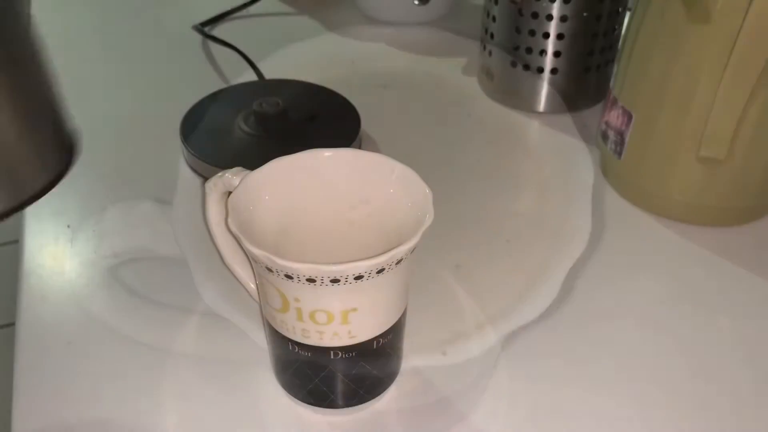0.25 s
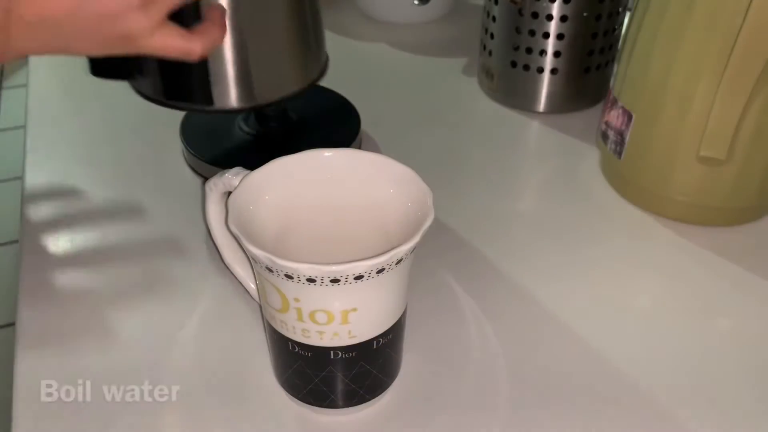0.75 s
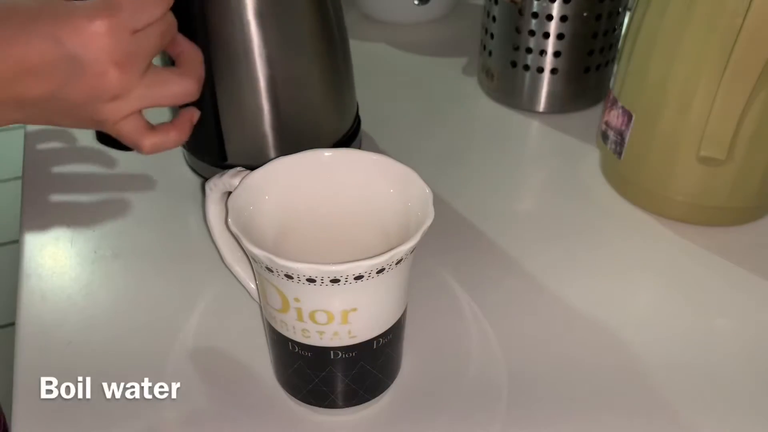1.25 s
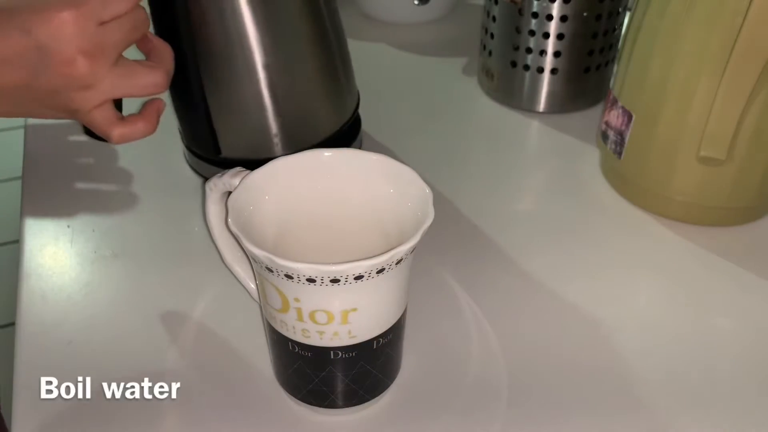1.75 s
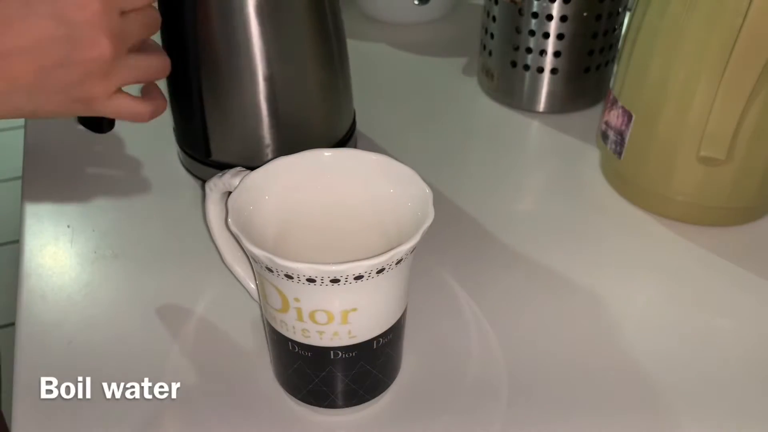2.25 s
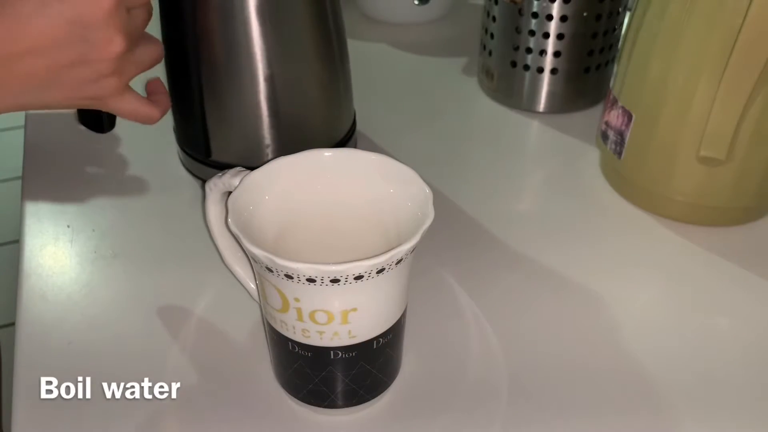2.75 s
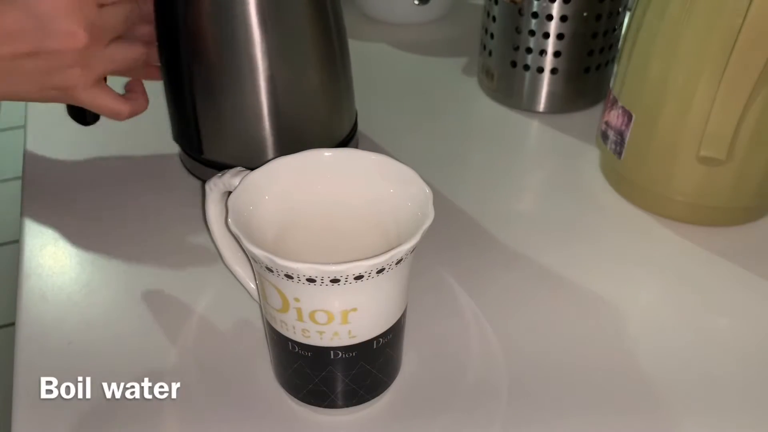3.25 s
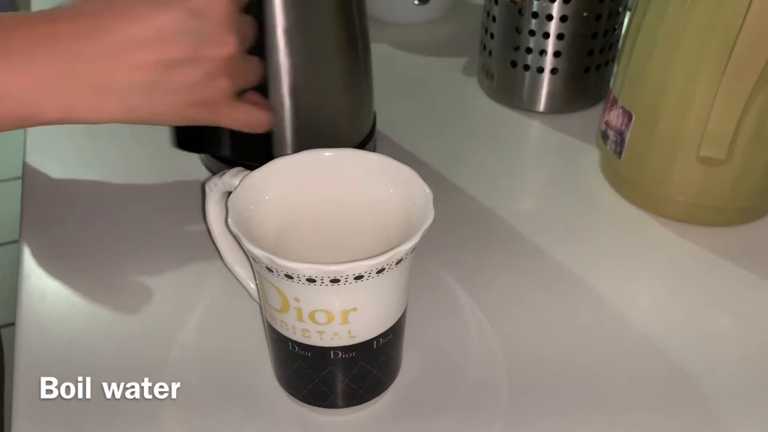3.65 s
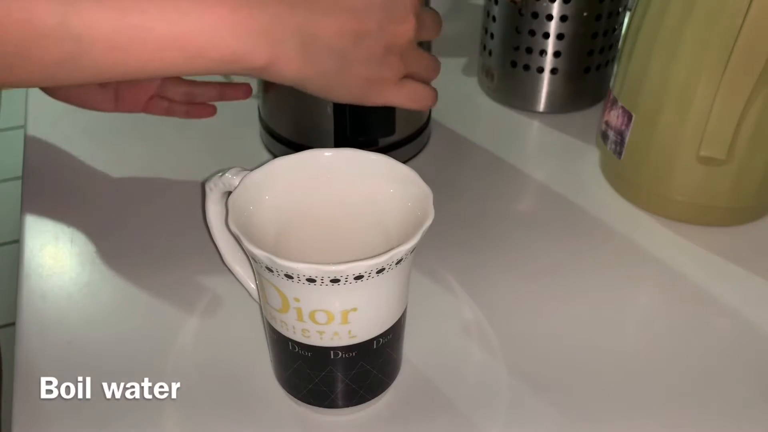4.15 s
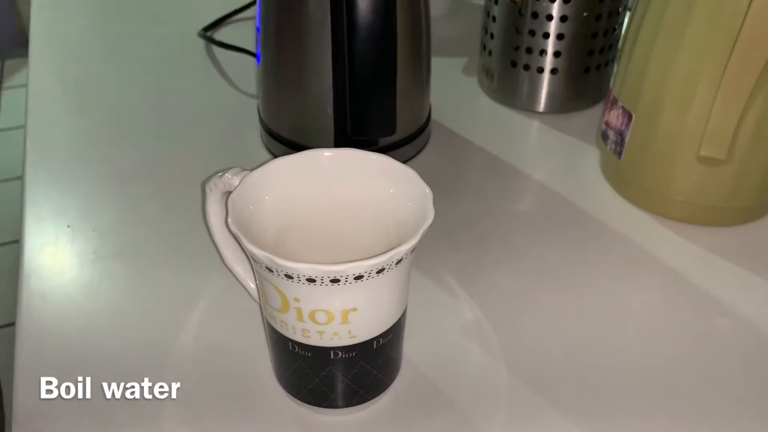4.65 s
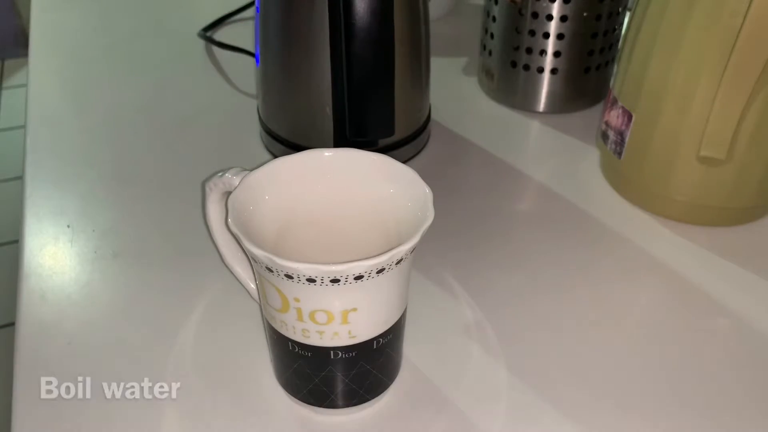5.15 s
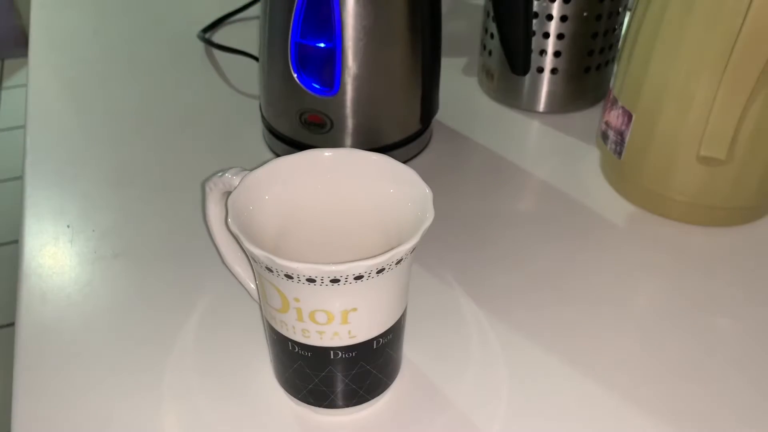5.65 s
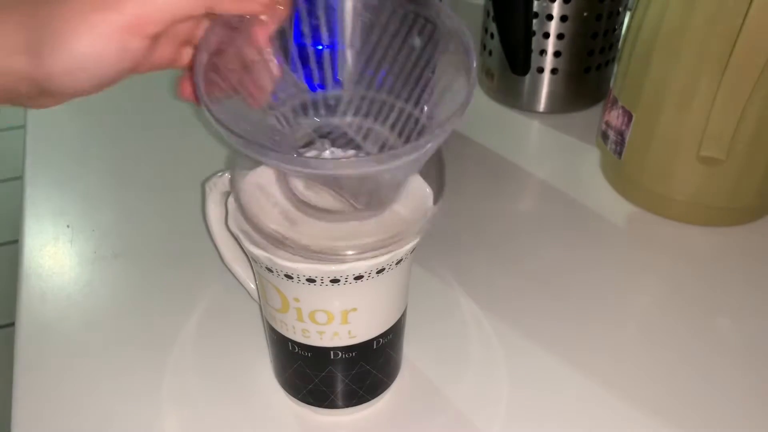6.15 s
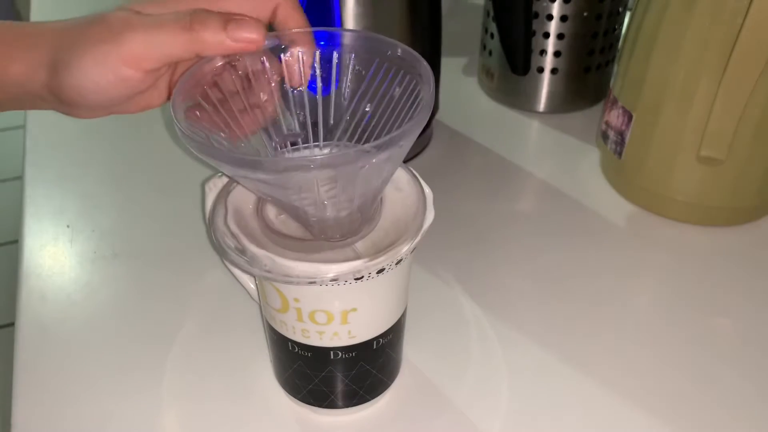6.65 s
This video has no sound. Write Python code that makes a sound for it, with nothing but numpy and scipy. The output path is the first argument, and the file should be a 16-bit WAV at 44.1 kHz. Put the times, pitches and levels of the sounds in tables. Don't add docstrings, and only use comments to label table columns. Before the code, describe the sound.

In a small hard kitchen with a faint fridge hum, a lid snaps shut, then a steel kettle knocks onto its plastic base and is turned with dull bumps, rubbing, brief squeaks and small clicks. The sound cuts abruptly to a steady hissing, singing boil. A hard plastic dripper clacks onto a mug, bounces and rattles into place. Close stereo phone microphone, short lively room tail.

```python
import sys
import numpy as np
from scipy import signal
from scipy.fft import rfft, irfft, next_fast_len
from scipy.io import wavfile
from scipy.ndimage import uniform_filter1d

SR = 44100
rng = np.random.default_rng(int(sys.argv[2]) if len(sys.argv) > 2 else 0)


def file_out(sig):
    cols = np.atleast_2d(sig).T
    lim = np.clip(cols, -1, 1)
    pcm = np.round(lim * 32767).astype(np.int16)
    wavfile.write(sys.argv[1], SR, pcm)


def to_linear_factor(level_db):
    exponent = np.asarray(level_db, float) / 20
    return 10 ** exponent


N = 303893
T = np.arange(N) / SR
CHANGE_S, FADE_OUT_S, FADE_IN_S = 5.386, 0.03, 0.022

# f/Hz, level/dB per Hz
AIR = [(30, -3), (145, -8.5), (239, -10.5), (500, -20), (780, -22.5), (1000, -27), (4530, -46.5),
       (16000, -51)]
AIR_DB = -53
# f/Hz, level/dB
HUM = [(123.4, -60.5), (226.3, -72.5), (59.7, -71)]
# loudest t/s, swell t/s, fade t/s, level/dB, treble over it/dB
SLIDES = [(.06, 0.1, 0.22, -62, -0.5), (.35, 0.14, 0.21, -60, -6), (.64, .007, 0.28, -57.5, -1),
          (.75, 0.15, 0.084, -59, 1), (1.39, 0.067, 0.19, -65.5, -11), (1.816, 0.023, .05, -61, -10),
          (2.19, 0.067, 0.17, -76, -20), (2.44, 0.064, 0.04, -68, -9), (3.016, .03, 0.077, -64.5, -27),
          (3.17, 0.066, 0.097, -65.5, -13), (3.33, 0.12, 0.27, -59, -9.5), (3.5, 0.025, 0.22, -66.5, -4),
          (3.68, 0.64, 0.35, -66.5, -1), (3.88, 0.17, 0.26, -63.5, -0.5), (4.01, 0.34, 0.11, -63, -13),
          (4.157, 0.0053, 0.13, -52.5, -16), (4.25, 0.065, 0.11, -68, -7), (4.44, 0.36, 0.28, -69.5, 0),
          (4.78, 0.13, 1, -66.5, -1), (4.983, 0.052, 0.13, -49, -10.5), (5.06, .05, 0.13, -66, -11),
          (5.222, 0.15, 0.031, -70.5, -37.5), (5.328, 0.0075, 0.084, -55.5, -21)]
# loudest t/s, swell t/s, fade t/s, level/dB
RUBS = [(.05, 0.044, 0.11, -65), (.34, 0.11, 0.18, -77), (.64, 0.0068, 0.25, -51), (1.41, 0.15, 0.21, -57),
        (1.69, 0.26, 0.13, -64.5), (1.822, .022, 0.07, -38.5), (2.16, 0.14, .25, -61),
        (2.45, 0.11, 0.11, -65), (3.02, .05, .15, -70.5), (3.28, 0.23, 0.08, -66), (3.5, 0.96, 0.53, -65),
        (3.767, 0.011, 0.036, -52), (3.9, 0.54, 0.45, -60.5), (4.2, 0.046, 0.21, -63),
        (4.606, 0.022, 0.089, -58.5), (4.72, .05, 0.16, -61), (4.984, 0.039, 0.18, -54.5),
        (5.116, 0.0092, .1, -60), (5.25, 0.038, 0.1, -63), (5.345, 0.048, 0.058, -51.5)]
# f/Hz, width/Hz, level/dB
HAND_ON_KETTLE = [(842, 58, 5), (1235, 35, 8), (1790, 36, 6), (2035, 59, 10), (2514, 30, -15),
                  (3280, 64, 6)]
STROKE_DB, STROKE_BEND = 22.5, 1.3

# t/s, shell peak level/dB, hollow boom peak level/dB, hardness/dB per octave
LID = [
    (0.0745, -27.5, -24, 5.5),
    (0.0795, -23.5, -12, 3.5),
    (0.359, -54, -55, 1.5),
]
# f/Hz, level/dB, t60/s
LID_MODES = [(208, -15, 0.038), (270.7, -8.5, 0.034), (321.4, -6.5, 0.043), (373, -17, 0.044),
             (559, -20.5, 0.032), (800, -26.5, 0.092), (1283, -25.5, 0.093), (2750, -28, 0.044),
             (4236, -32, 0.045), (5140, -29.5, 0.045), (8330, -30, 0.023)]
# t/s, peak level/dB, pitch/octaves above the lowest boom
THUDS = [(0.081, -28, 2.24), (0.586, -61.5, 0.18), (1.032, -39, 0.69), (1.152, -46.5, 1.1),
         (1.202, -55, .05), (1.444, -52.5, 1.1), (1.828, -30.5, 0.26), (1.851, -39.5, 1.06),
         (1.896, -32.5, 0.9), (2.106, -40.5, 0.63), (2.327, -59, 0.69), (2.601, -45.5, 0.52),
         (3.144, -45, 0.4), (3.346, -46, 0.92), (3.44, -51, 0.91), (3.502, -50, 0.37), (3.807, -47.5, 0.2),
         (3.903, -38.5, 0.6), (4.097, -44.5, 0.25), (4.233, -42.5, 0.62), (4.615, -47, 0.45),
         (4.704, -35, 0.24), (5.028, -43.5, 0.32), (5.124, -35, 0.21), (5.268, -49, 1.05),
         (6.248, -42.5, 0.85), (6.356, -35, 1.52), (6.447, -40.5, 1.17)]
# f/Hz, t60/s
BOOM = [(55, 0.46), (79, 0.21), (116, 0.33), (200, 0.092)]
PUSH_DB_PER_OCT = 13
# loudest t/s, swell t/s, fade t/s, level/dB, f/Hz
SQUEAKS = [(.365, 0.027, .15, -66.5, 1960), (.65, 0.014, 0.2, -53, 1570), (.74, 0.027, .04, -50.5, 520),
           (.76, .08, .1, -60, 4530), (1.4, .08, 0.07, -67, 3300), (1.43, .04, .08, -59, 523),
           (1.49, 0.11, 0.084, -61, 1620), (1.7, .3, .25, -77, 4800), (2.12, .15, 0.092, -73, 2030),
           (3.245, 0.0074, .05, -55.5, 750), (3.31, 0.0083, 0.043, -52, 590), (3.5, .012, 0.51, -70, 3200),
           (3.55, .5, .6, -59.5, 876), (3.8, 0.34, 0.17, -71, 1920), (3.95, .2, 0.29, -62, 1185),
           (4.17, .02, .15, -71, 3300), (4.98, .04, 0.1, -57, 2060), (5.05, 0.058, 0.07, -60, 380),
           (5.34, 0.018, 0.076, -51.5, 2400)]
SQUEAK_Q = 6
# t/s, shell peak level/dB, hollow boom peak level/dB, hardness/dB per octave
BASE = [(0.634, -33.5, -55.5, -13), (1.023, -29, -62, -8.5), (1.031, -13.5, -24, -8), (1.037, -28, -34, -4),
        (1.089, -35, -61, -6), (1.144, -22, -62, -10), (1.151, -42, -25.5, -4), (1.202, -21, -69, -10),
        (1.248, -36.5, -70, -11), (1.415, -39.5, -44.5, -12.5), (1.826, -18.5, -30, -8.5),
        (1.808, -38, -60, -13), (1.819, -31, -60, -9), (1.843, -61, -60, 10), (1.847, -35.5, -42, -10),
        (1.89, -19, -35, -5.5), (2.137, -45.5, -59, -24), (3.016, -49, -65.5, -8),
        (3.139, -35.5, -48, -11.5), (3.305, -54, -51.5, -19), (3.765, -45, -52, -9), (3.842, -33, -66, -12),
        (3.895, -44.5, -48.5, -10), (4.085, -58.5, -48, -14), (4.155, -50, -74.5, -5.5),
        (4.6, -64.5, -48, -7), (4.698, -42.5, -43, -6.5), (5.118, -42.5, -45.5, -10),
        (5.326, -43, -44.5, -13)]
# f/Hz, level/dB, t60/s
BASE_MODES = [(222, -3, 0.05), (351, 10, 0.058), (806, -8.5, 0.058), (921, -8, 0.071), (1206, -16, 0.043),
              (1432, -17, 0.034), (1888, -14.5, 0.043), (2083, -11.5, 0.056), (2600, -4, 0.04),
              (3340, -4, 0.043), (4000, -10, 0.032), (4870, -32, 0.016)]
# f/Hz, width/Hz, level/dB
STEEL = [(1192, 3.5, -3), (2050, 6.8, -7), (4800, 13, -18)]
# t/s, shell peak level/dB, hollow boom peak level/dB, hardness/dB per octave
HANDLE = [
    (2.403, -38.5, -59, -4),
    (2.624, -46, -56, 2.5),
    (2.632, -27.5, -52, 0.9),
]
# f/Hz, level/dB, t60/s
HANDLE_MODES = [(387, -10, 0.041), (824, -10, 0.12), (910, -11.5, 0.054), (1420, -6, .05),
                (1580, 0.5, 0.047), (1694, 1.5, 0.043), (2910, -8.5, 0.054), (3820, -5, 0.029),
                (4510, -7, 0.027), (7060, -2, 0.03), (8120, 3, 0.031)]
# t/s, shell peak level/dB, hollow boom peak level/dB, hardness/dB per octave
SWITCH = [
    (3.488, -48, -50.5, 1.5),
]
# f/Hz, level/dB, t60/s
SWITCH_MODES = [(380, -10, 0.039), (3200, 7, 0.04), (3300, 3, 0.036), (3000, -6, .03), (4630, -4, 0.02)]

# f/Hz, width/Hz, level/dB
KETTLE = [(356.5, 14.5, -6), (464.5, 13, -3), (580, 85, -23), (785, 41, -8.5), (915.5, 18.7, 0),
          (1263, 50, -10), (1387, 44.5, -13), (1510, 32, -23), (1777, 16.6, -7.5), (2570, 31, -19),
          (2707, 40, -17.5), (3110, 23, -19), (4540, 57, -19)]
# f/Hz, level/dB per Hz
STEAM = [(88, -54), (150, -15.5), (466, -17), (1760, -12), (10000, -27.5), (11700, -37.5), (13700, -32.5),
         (16000, -84)]
# t/s, level/dB
BOIL = [
    (5.391, -40.5),
    (5.6, -39.5),
    (5.9, -40),
    (6.15, -39),
    (6.5, -37.5),
    (6.89, -39),
]
DRIFT, FLICKER_DB = 0.007, 3
# t/s, shell peak level/dB, hollow boom peak level/dB, hardness/dB per octave
DRIPPER = [
    (6.2105, -33, -56, -2),
    (6.2148, -24.5, -36, 5.5),
    (6.22, -24, -46, 1.5),
    (6.2375, -23.5, -42, 1.5),
    (6.252, -29, -48, -1),
    (6.264, -37, -44, 3.5),
]
# f/Hz, level/dB, t60/s
DRIPPER_MODES = [(360, -10, 0.022), (930, -22, .04), (1195, -8.5, 0.037), (2110, -9.5, 0.043),
                 (2550, -18, 0.07), (3300, -11, 0.029), (4990, -14, 0.02), (6320, -11, 0.019),
                 (8230, -11, 0.028), (10300, -12.5, 0.019), (13560, -21, 0.013)]
# t/s, shell peak level/dB, hollow boom peak level/dB, hardness/dB per octave
SEATING = [(6.327, -25.5, -39, 0.5), (6.335, -31, -52, -1), (6.347, -29.5, -34, -0.5),
           (6.3515, -20.5, -35, 5), (6.357, -22.5, -37, -11), (6.366, -25, -37.5, 3), (6.376, -31, -40, -1),
           (6.399, -38.5, -34.5, 4.5), (6.43, -43, -38, -10), (6.441, -29.5, -48, 4), (6.45, -50, -48, -1),
           (6.528, -42.5, -35, 4.5), (6.538, -45, -57, -4)]
# f/Hz, level/dB, t60/s
SEATING_MODES = [(362, -10, 0.02), (741, -8.5, 0.049), (920, -11, 0.025), (1200, -10.5, 0.049),
                 (1854, -14, 0.032), (2190, -16, 0.042), (3300, -11.5, 0.022), (4890, -16, 0.015),
                 (6500, -15.5, 0.04), (7960, -10, 0.021), (9800, -13.5, .014), (13500, -20, 0.013)]

KNOCK_HZ = (1000, 3200, 8500)
# f/Hz, likeness/-1..1
LIKENESS = [(60, 0.68), (290, .78), (640, 0.095), (1400, .05), (3000, 0.18), (15000, -0.55)]
# f/Hz, t60/s
ROOM = [(100, 0.38), (400, 0.31), (1500, 0.32), (5000, 0.37), (12000, 0.26)]
# band number (each 689 Hz wide), share of moments kept in mid, in side
PATCHY = [(14, 1, .4), (15, 1, .45), (16, .22, 1), (17, .04, 1), (18, 1, .7), (19, 1, .03), (20, .8, .6),
          (21, 0, .6), (22, 0, .12), (23, 0, 0)]


def on_log(hz, table):
    f, v = np.transpose(table)
    return np.interp(np.log(np.maximum(hz, 1)), np.log(f), v)


def shape(x, gain):
    size = next_fast_len(x.shape[-1])
    hz = np.arange(size // 2 + 1) * SR / size
    return irfft(rfft(x, size) * gain(hz), size)[..., :x.shape[-1]]


def level(x, db):
    return x * to_linear_factor(db) / np.sqrt(np.mean(x ** 2))


def add(out, x, s):
    i = int(s * SR)
    out[..., i:i + x.shape[-1]] += x[..., :out.shape[-1] - i]


def walk(rate, size=N):
    hold = int(SR / rate)
    steps = np.repeat(rng.standard_normal(size // hold + 1), hold)
    return 1.3 * uniform_filter1d(uniform_filter1d(steps, hold), hold)[:size]


def grains(rate, scatter_db, size=N):
    out = np.zeros((2, size))
    where = rng.random((2, size)) < rate / SR
    count = where.sum()
    tick_size = to_linear_factor(-scatter_db * np.log(0.003 + rng.random(count)))
    out[where] = tick_size * rng.standard_normal(count)
    return out


def resonate(x, peaks):
    def gain(f):
        total = 0
        for k, (hz, width_hz, db) in enumerate(peaks):
            total = total + (-1) ** k * to_linear_factor(db) / (1 + 1j * (f * f - hz * hz) / (width_hz * f + 1e-9))
        return total
    return shape(x, gain)


def sing(x, hz, width_hz):
    wandering_hz = hz * (1 + DRIFT * walk(7.6, size=x.shape[-1]))
    turn = np.exp(2j * np.pi * np.cumsum(wandering_hz) / SR)
    pole = np.exp(-np.pi * width_hz / SR)
    return 2 * (signal.lfilter([1 - pole], [1, -pole], x / turn) * turn).real


def strokes(rows):
    power = np.zeros(N)
    for s, swell_s, fade_s, db in rows:
        t = T[:int(4 * (swell_s + fade_s) * SR)] - 4 * swell_s
        away = np.abs(t) / np.where(t < 0, swell_s, fade_s)
        stroke = to_linear_factor(2 * (db - STROKE_DB * away ** STROKE_BEND))
        start = max(s - 4 * swell_s, 0)
        add(power, stroke[int((start - s - t[0]) * SR):], start)
    return np.sqrt(power)


def knocks(table, modes, crack_db, crack_s, damp, flutter, bite_db):
    out, t = np.zeros(N), T[:6144]
    lead = 400
    hz, db, t60 = np.transpose(modes)[:, :, None]
    body = hz[:, 0] < 600
    for s, shell_db, low_db, hard_db in table:
        luck = rng.standard_normal((2, len(modes), 1))
        loudness = to_linear_factor(db - db[~body].max() + 2.5 * luck[0])
        ring = loudness * np.sin(2 * np.pi * hz * (1 + 0.012 * luck[1]) * t)
        chatter = uniform_filter1d(rng.standard_normal(ring.shape), 60)
        ring[~body] *= 1 + flutter * chatter[~body]
        ring = ring * (1 - np.exp(-t * hz / 3.2)) ** 2 * 1000. ** (-t / (damp * t60))
        boom = ring[body].sum(0)
        add(out, boom * to_linear_factor(low_db) / np.abs(boom).max(), s)
        fade = np.exp(-t / crack_s) + to_linear_factor(-22) * np.exp(-t / 0.018)
        fade = fade * np.minimum(t / 0.00061, 1)
        crack = to_linear_factor(crack_db) * fade * rng.standard_normal(len(t))
        blow = np.roll(ring[~body].sum(0) + crack, lead)
        peaks_db = shell_db + hard_db * np.log2(np.divide(KNOCK_HZ, KNOCK_HZ[0])) + [0, bite_db, 0]
        for k, peak_db in enumerate(peaks_db):
            share = list(zip(KNOCK_HZ, np.arange(3) == k))
            band = shape(blow, lambda f: on_log(f, share) * f ** 2 / (f ** 2 + 550 ** 2))
            add(out, band * to_linear_factor(peak_db) / np.abs(band).max(), s - lead / SR)
    return out


def spread(pair):
    mid = shape(pair[0], lambda f: np.sqrt(1 + np.clip(on_log(f, LIKENESS), -1, 1)))
    side = shape(pair[1], lambda f: np.sqrt(1 - np.clip(on_log(f, LIKENESS), -1, 1)))
    return np.array([mid + side, mid - side]) / np.sqrt(2)


def ports(x, lag, pan_db):
    return np.array([np.roll(x, lag) * to_linear_factor(pan_db / 2), x * to_linear_factor(-pan_db / 2)])


def room(x, wet_db):
    t, tail = T[:int(0.7 * SR)], 0
    for k, (_, t60) in enumerate(ROOM):
        share = [(f, j == k) for j, (f, _) in enumerate(ROOM)]
        band = shape(rng.standard_normal((2, len(t))), lambda f: on_log(f, share))
        tail = tail + band * 1000. ** (-t / t60)
    tail = tail * np.minimum(t / 0.0018, 1)
    tail = spread(shape(tail, lambda f: 1 - 0.17 * np.exp(-np.log2(f / 360 + 1e-9) ** 2)))
    tail = tail / np.sqrt((tail ** 2).sum() / 2)
    return to_linear_factor(wet_db) * signal.fftconvolve(x[None], tail, axes=1)[:, :N]


def fridge():
    air = shape(spread(rng.standard_normal((2, N))), lambda f: to_linear_factor(on_log(f, AIR)))
    air = level(air, AIR_DB) * to_linear_factor(1.4 * walk(3.605))
    hum = 0
    for hz, db in HUM:
        wave = np.sin(2 * np.pi * hz * T + 1.7 * walk(5.1))
        hum = hum + to_linear_factor(db + 3.1 * walk(15)) * np.sqrt(2) * wave
    return air + hum


def scuffs():
    cloth = strokes([row[:4] for row in SLIDES])
    fine = strokes([(s, a, b, db + treble_db) for s, a, b, db, treble_db in SLIDES])
    palm = strokes(RUBS)
    out = 0
    for gain, hz, wide in ((cloth, 2800, 0.98), (fine, 9000, 0.9), (palm, 720, 0.85)):
        slips = grains(5000, 1.3) * to_linear_factor(1.3 * walk(45))
        slips = slips + resonate(slips, HAND_ON_KETTLE)
        band = shape(slips, lambda f: np.exp(-(np.log2(f / hz + 1e-9) / wide) ** 2))
        out = out + level(band, 0.59) * gain
    return spread(out)


def lid_knocks():
    return knocks(LID, LID_MODES, crack_db=1.0, crack_s=0.011, damp=0.7, flutter=4.5, bite_db=-4)


def thuds():
    out, t = np.zeros(N), T[:int(0.5 * SR)]
    for s, push_db, octave in THUDS:
        for hz, t60 in BOOM:
            db = push_db - PUSH_DB_PER_OCT * abs(np.log2(hz / BOOM[0][0]) - octave)
            swell = (1 - np.exp(-t / 0.0056)) * 1000. ** (-t / t60)
            wave = np.sin(2 * np.pi * hz * (1 + 0.12 * rng.standard_normal()) * t)
            add(out, to_linear_factor(db + 5.5) * swell / swell.max() * wave, s)
    return out


def squeaks():
    out = np.zeros((2, N))
    for s, swell_s, fade_s, db, hz in SQUEAKS:
        t = T[:int(2 * (swell_s + fade_s) * SR)] - 2 * swell_s
        away = np.abs(t) / np.where(t < 0, swell_s, fade_s)
        gain = to_linear_factor(db - STROKE_DB * away ** STROKE_BEND + 2.7 * walk(39.2, size=len(t)))
        slips = sing(rng.standard_normal((2, len(t))), hz, hz / SQUEAK_Q)
        slips = sing(slips, hz, 2 * hz / SQUEAK_Q)
        add(out, level(slips, 0) * gain, s + t[0])
    return spread(out)


def base_knocks():
    base = knocks(BASE, BASE_MODES, crack_db=7, crack_s=0.0044, damp=0.73, flutter=4.5, bite_db=-0.7)
    switch = knocks(SWITCH, SWITCH_MODES, crack_db=1.5, crack_s=0.0026, damp=0.69, flutter=1.3, bite_db=7.0)
    both = base + switch
    return both + resonate(both, STEEL)


def handle_knocks():
    return knocks(HANDLE, HANDLE_MODES, crack_db=4, crack_s=0.003, damp=0.66, flutter=3.5, bite_db=2.5)


def kettle():
    first = int(CHANGE_S * SR)
    size = N - first
    pops = grains(3500, 2.5, size=size) * to_linear_factor(0.79 * walk(30, size=size))
    shell = 0
    for k, (hz, width_hz, db) in enumerate(KETTLE):
        flicker = to_linear_factor(db + FLICKER_DB * walk(14.05, size=size))
        shell = shell + (-1) ** k * flicker * sing(pops, hz, width_hz)
    hiss = grains(6000, 0.78, size=size) * to_linear_factor(2.14 * walk(20, size=size))
    hiss = shape(hiss, lambda f: to_linear_factor(on_log(f, STEAM)))
    direct, around = level(shell, -2.2) + level(hiss, -4.0)
    heard = to_linear_factor(-1.5) * ports(direct, lag=-3.5, pan_db=-1.6)
    heard = heard + to_linear_factor(0.5) * spread([around, around[::-1]])
    s, db = np.transpose(BOIL)
    return np.pad(heard, ((0, 0), (first, 0))) * to_linear_factor(np.interp(T, s, db))


def dripper_knocks():
    landing = knocks(DRIPPER, DRIPPER_MODES, crack_db=4, crack_s=0.00268, damp=1.0, flutter=1.6, bite_db=4)
    seating = knocks(SEATING, SEATING_MODES, crack_db=4, crack_s=0.0025, damp=1.0, flutter=2.5, bite_db=2.5)
    return landing + seating


def scene():
    boom = thuds()
    both = fridge() + ports(boom, lag=0, pan_db=-2.5) + room(boom, -9.5)

    lid, base, handle = lid_knocks(), base_knocks(), handle_knocks()
    before = scuffs() + ports(lid, lag=-15.5, pan_db=8) + squeaks()
    before = before + ports(base + handle, lag=9, pan_db=-2.0)
    before = before + room(to_linear_factor(1.05) * lid + to_linear_factor(-1.5) * base + to_linear_factor(-4.5) * handle, 0)

    dripper = dripper_knocks()
    after = kettle() + ports(dripper, lag=-5, pan_db=-2.5) + room(dripper, -5.5)

    fade_out = np.clip((CHANGE_S - T) / FADE_OUT_S, 0, 1)
    fade_in = np.clip((T - CHANGE_S) / FADE_IN_S, 0, 1)
    return (before + both) * fade_out + (after + both) * fade_in


def patchy_treble(x):
    mid_side = np.array([x[0] + x[1], x[0] - x[1]]) / 2
    f, _, z = signal.stft(mid_side, SR, nperseg=2048, noverlap=1024)
    treble = (np.abs(z[:, f > 9000]) ** 2).sum((0, 1))
    attack = treble > 6 * np.roll(treble, 2)
    for band, *kept in PATCHY:
        keep = rng.random((2, len(treble))) < np.array(kept)[:, None]
        if band not in (17, 21):
            keep = keep | attack
        z[:, band * 32:band * 32 + 32] *= keep[:, None]
    mid, side = signal.istft(z, SR, nperseg=2048, noverlap=1024)[1][:, :N]
    return np.array([mid + side, mid - side])


def top_cut(x):
    return signal.sosfilt(signal.butter(12, 16490, fs=SR, output="sos"), x)


def record(dry):
    x = signal.sosfilt(signal.butter(6, 44, "high", fs=SR, output="sos"), dry)
    x = signal.sosfilt(signal.ellip(8, 0.2, 70, 16300, fs=SR, output="sos"), x)
    x = signal.sosfilt(signal.butter(6, 14400, fs=SR, output="sos"), x)
    mix = patchy_treble(x)
    return top_cut(mix)


dry = scene()
out = record(dry)
file_out(out)
```